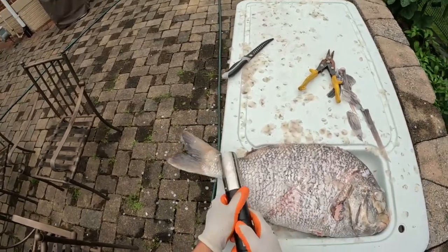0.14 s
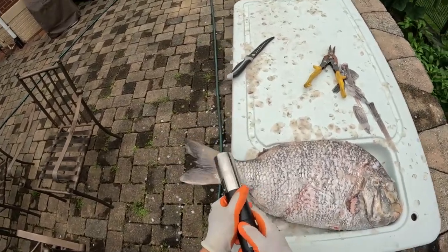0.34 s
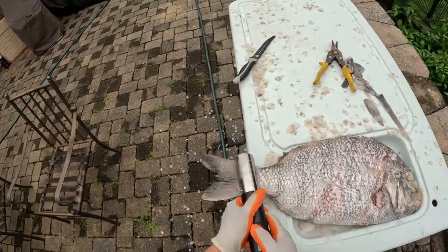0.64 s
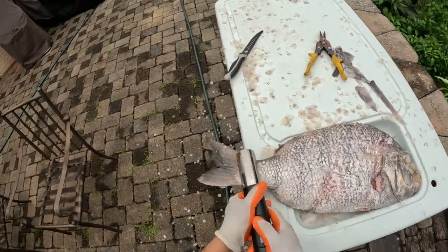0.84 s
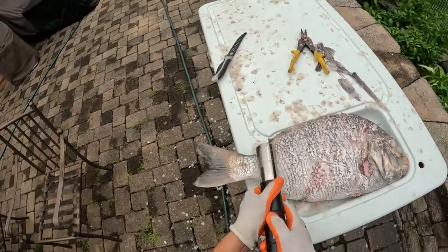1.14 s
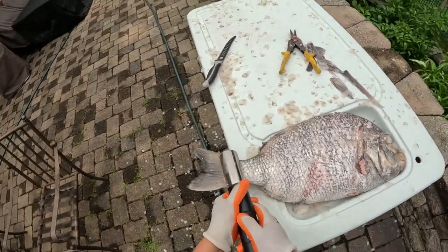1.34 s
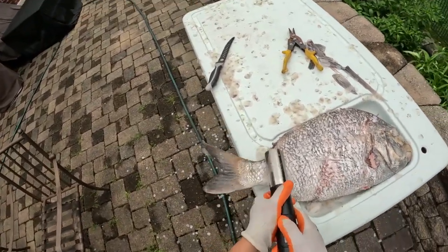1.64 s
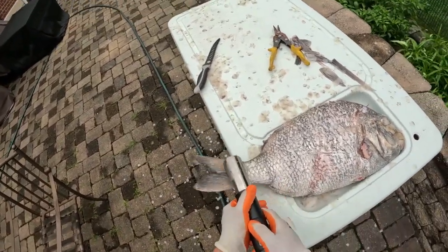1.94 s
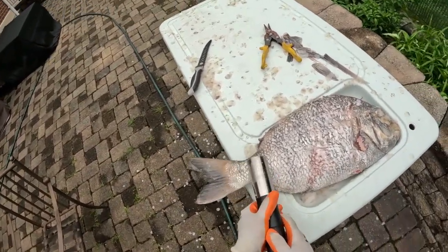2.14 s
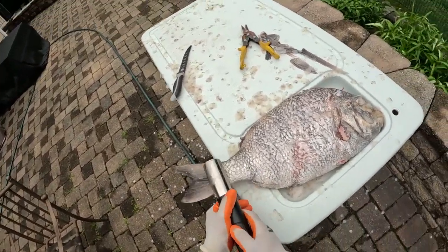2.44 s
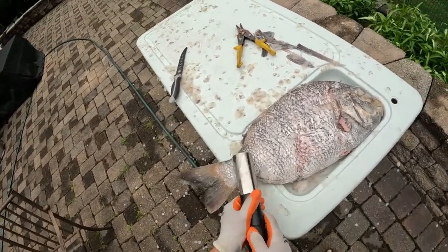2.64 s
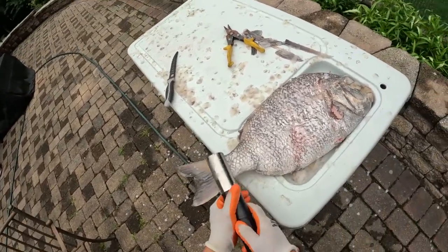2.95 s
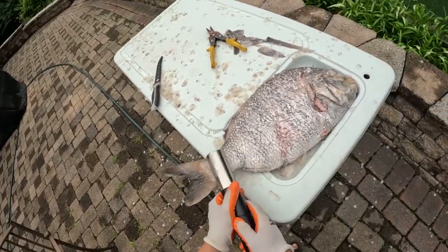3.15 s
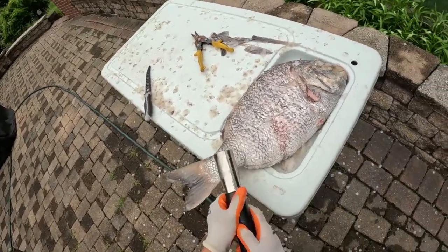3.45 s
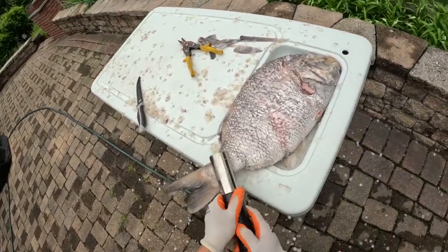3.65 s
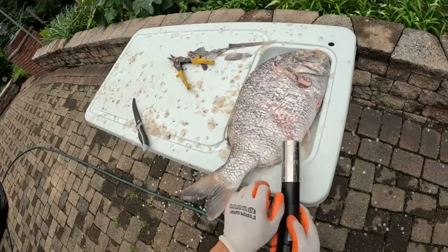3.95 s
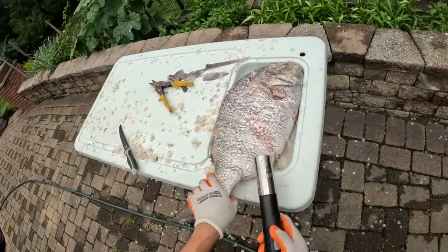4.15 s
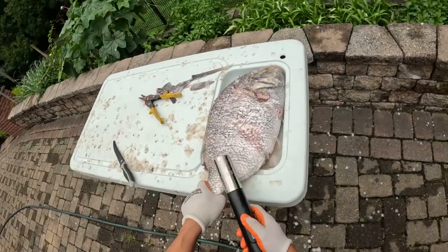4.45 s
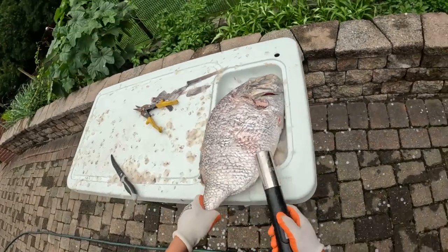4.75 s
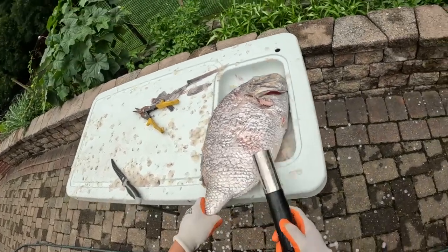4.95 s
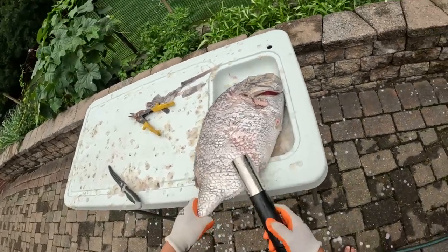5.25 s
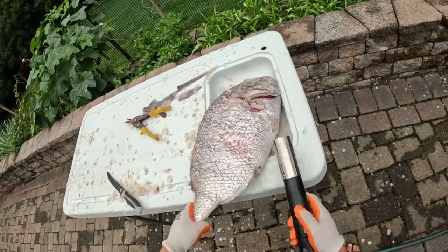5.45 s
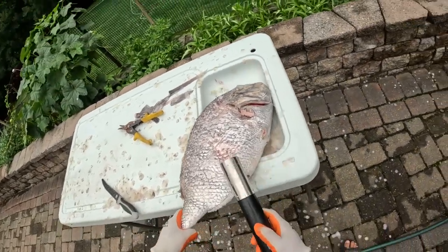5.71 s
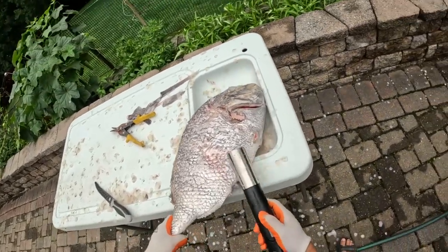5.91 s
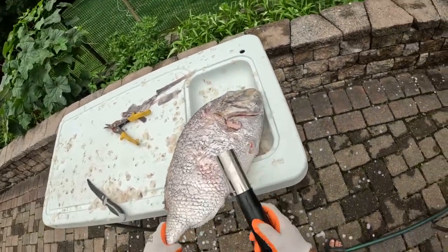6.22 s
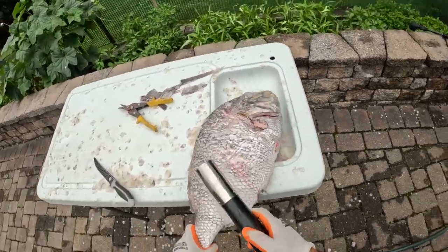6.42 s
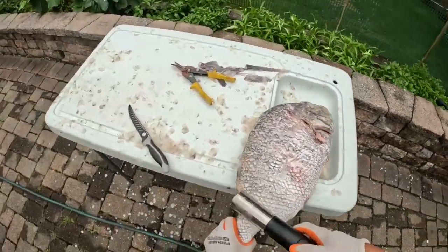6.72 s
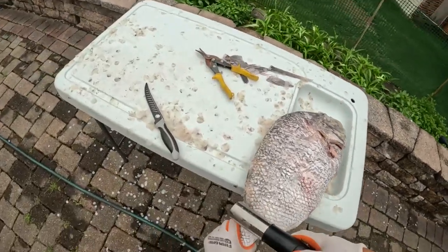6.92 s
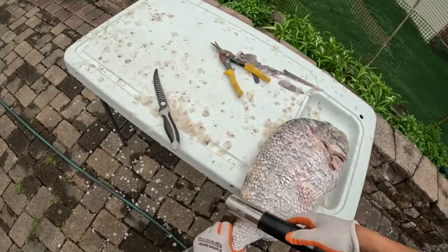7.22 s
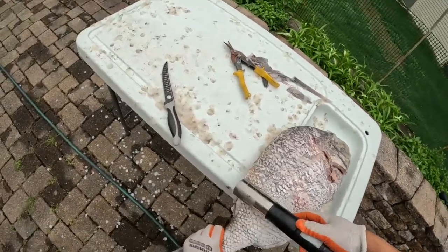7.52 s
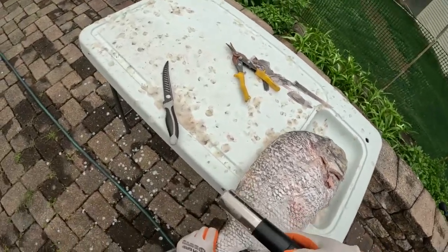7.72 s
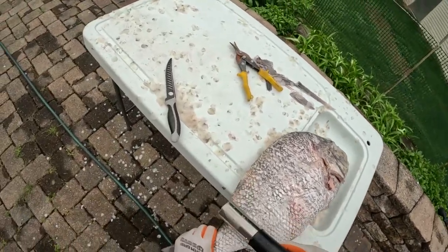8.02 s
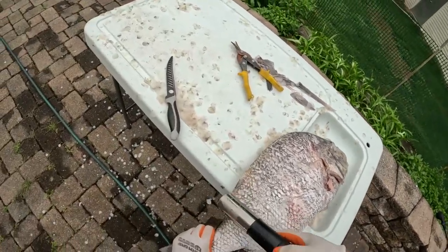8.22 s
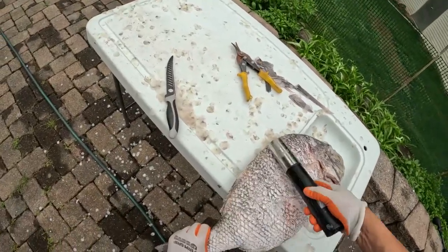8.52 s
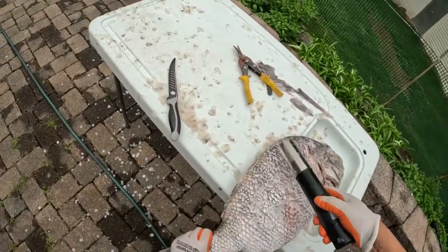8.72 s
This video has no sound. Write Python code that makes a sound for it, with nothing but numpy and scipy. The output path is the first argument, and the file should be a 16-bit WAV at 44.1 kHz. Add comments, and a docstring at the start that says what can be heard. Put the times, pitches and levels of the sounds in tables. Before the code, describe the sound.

Geared motor tool buzzes and groans outdoors, rasping off fish scales in short strokes, stopping twice near the end, with light wind behind.

```python
"""First the rattle and whine of a geared electric scaler, held in the hand over a fish on a hollow plastic
table outdoors. The rattle repeats every turn of the drum, and the gears slow and groan under load.
Six blades scrape and flick scales off, the fish thumps the table, and the switch is let go twice.
Behind it lies a light wind of shaped noise. Two close microphone ports; gain control ducks after hits."""
import sys
import numpy as np
from scipy import signal
from scipy.fft import rfft, irfft
from scipy.io import wavfile
from scipy.ndimage import uniform_filter1d, map_coordinates

SR = 44100
rng = np.random.default_rng(int(sys.argv[2]) if len(sys.argv) > 2 else 0)


def attenuation_scalar(level_db):
    """Turn a level in dB into a linear amplitude multiplier (20 dB per decade)."""
    decades = np.asarray(level_db, float) / 20
    return 10 ** decades


def store_pcm(level_fs):
    """Save levels as 16-bit WAV."""
    pcm = np.round(np.clip(level_fs, -1, 1) * 32767).astype(np.int16)
    wavfile.write(sys.argv[1], SR, np.atleast_2d(pcm).T)


N = 391166  # length in samples

# Levels in the tables are relative: each source sets its own gain, and gain control follows.
# blades pressed on the fish: (start t/s, length t/s, full sag of the whine before judder f/Hz,
# scrape level/dB, shake of the fish level/dB)
PRESSES = [(0, 0.26, 247.8, -40, -51), (0.522, .12, 694, -40.5, -47), (0.781, .29, 597.2, -38.5, -41),
           (1.408, 0.29, 720.8, -38.5, -40.5), (1.912, .24, 479.4, -39.5, -58),
           (2.427, 0.13, 232.3, -41, -46), (2.511, 0.17, 1044, -35, -65), (3.126, 0.19, 757.3, -38, -63),
           (3.67, 0.19, 891.7, -39, -44), (4.515, 0.16, 189.8, -45, -43.5),
           (4.65, 0.24, 519.1, -41.5, -43.5), (5.239, 0.18, 797.8, -40, -37),
           (5.889, .16, 651, -41.5, -36.5), (7.083, 0.15, 198.8, -46, -44), (7.18, 0.27, 450.8, -41, -44.5),
           (8.171, 0.2, 266, -48.5, -41), (8.397, 0.17, 109.7, -42, -53), (8.469, 0.16, 402, -41.5, -39.5)]
# switch let go, then pressed again: (off t/s, on t/s)
SWITCH_RESTS = [(6.355, 7.056), (7.43, 7.962)]
# no-load pitch of the gear whine, mostly falling as the battery tires: (t/s, f/Hz)
FREE_WHINE = [(0, 4016), (3.0, 3962), (5.0, 3865), (6.3, 3857), (8.1, 3800), (8.87, 3895)]
# the hand turns and moves the tool: (t/s, gear rattle level/dB, whine level/dB, shell chatter level/dB)
HAND_LEVELS = [(0, -28, -24, -37), (.3, -30.5, -33, -32.5), (.58, -28, -38, -32.5), (1.3, -29, -32, -36.5),
               (2.2, -28.5, -30, -35.5), (2.9, -32, -33, -38.5), (3.4, -28.5, -29, -40),
               (4.2, -29.5, -29, -36), (4.35, -28.5, -42, -46), (4.6, -29.5, -30.5, -29),
               (5.1, -30, -37.5, -37.5), (5.65, -31, -32, -41), (6.3, -30.5, -34.5, -41.5),
               (7.2, -30.5, -24, -26), (8.05, -29, -29.5, -34), (8.35, -27, -23.5, -24),
               (8.87, -28, -31.5, -39.5)]
# colour of the gear rattle through the housing: (f/Hz, level/dB)
HOUSING_COLOUR = [(240, -47), (500, -35.5), (950, -4), (1500, -2), (2020, -0.5), (2600, -2.5), (3250, -5.5),
                  (4150, -6), (4900, -7.5), (7910, -12), (14300, -39.5), (15500, -69)]
# bunching of the rattle round one to four times the tooth rate: (level/dB each)
MESH_LEVELS = 6.5, 0, 2, -22.5
# further gear tones: (cycles per turn of the drum each)
TONE_CYCLES = 16, 29, 86, 269, 359
# their levels against the rattle, before strain and waver: (level/dB each)
TONE_LEVELS = -17.5, -21, -11, -15.5, -21
# limit of their waver either way: (level/dB each)
TONE_WAVERS = 3.7, 3.3, 6.6, 13.2, 19.3
# modes of the gearbox shell: (f/Hz, level/dB, t60 t/s)
SHELL_MODES = [(1818, -2.5, 0.042), (1941, 6, 0.028), (2104, -4, 0.032)]
# the thin, bony tail end knocks harder than the thick flank: (t/s, level/dB)
BONY_KNOCK = [(2.2, 2.5), (2.8, -1)]
# broad rasp of the metal guard: (f/Hz, level/dB)
RASP_COLOUR = [(1760, -26.5), (3000, 7), (7850, 7), (11000, -6), (14500, -35.5)]
# short modes of the metal guard: (f/Hz, level/dB, t60 t/s)
GUARD_MODES = [(7290, -13.5, 0.0075)]
# modes of the hollow table top: (f/Hz, level/dB, t60 t/s)
TABLE_MODES = [(61, -1, 0.082), (126.6, 0.5, 0.089), (260, 3.5, 0.059), (332, -1.5, 0.075), (475, 2, 0.022),
               (623, -2.5, 0.034), (960, 5, 0.015), (1630, 2.5, 0.013)]
# scales snapping off: (t/s, level/dB)
SCALE_SNAPS = [(0.037, -15), (0.0673, -14.5), (0.134, -24), (0.8566, -6.5), (0.9842, -27), (1.0093, -6.5),
               (1.04, -12), (1.9746, -15.5), (2.016, -13), (2.0526, -13.5), (2.4442, -11.5), (2.542, -9),
               (2.566, -14.5), (2.5768, -4), (2.593, -26), (2.6005, -3), (2.6095, -9.5), (2.637, -3),
               (2.66, -28), (2.6798, -19.5), (2.6882, -14), (2.7332, -9), (3.2106, -25.5), (3.7413, -14),
               (3.8061, -12), (3.918, -13), (4.6891, -14), (4.7116, -15), (4.7299, -11.5), (4.7726, -13),
               (4.79, -19.5), (4.859, -13.5), (4.867, -9.5), (5.33, -10.5), (5.3498, -18.5), (5.3673, -16),
               (5.4911, -14), (7.345, -11.5), (7.4802, -17.5), (7.54, -23), (8.4924, -16)]
# small clicks: the switch pressed on at 7.06 s, then faint ticks while the motor rests: (t/s, level/dB)
SMALL_CLICKS = [(7.0566, -35), (7.7106, -45), (7.7298, -46), (7.8133, -51)]
# the fish lands on the table and bounces: (t/s, level/dB)
FISH_THUMPS = [(2.543, -28.5), (2.608, -20.5), (4.929, -23.5), (5.4998, -8), (5.509, -19), (5.547, -19.5),
               (6.09, -6.5), (6.115, -20), (6.143, -19.5), (6.177, -21.5), (7.428, -28), (7.482, -39)]
# colour of the wind: (f/Hz, level/dB)
WIND_COLOUR = [(12, -50), (30, -1), (65, 0), (233, -11), (369, -48), (1290, -24.5), (4000, -42.5),
               (11700, -67)]
# slow change in the level of the background wind: (t/s, level/dB)
WIND_LEVEL = [(0, -54.5), (6, -43.5), (8.87, -51.5)]
# shifting difference between the ports against their sum: (f/Hz, level/dB)
PORT_DIFFERENCE = [(25, -15.5), (100, -68), (2400, -13), (7000, -19), (12500, -11)]

WHINE_ORDER = 180  # whine cycles per turn of the drum; the tooth rate is half of this
BLADES = 6  # on the drum
LEAN_HZ_PER_S, EASE_S = 7500, 0.035  # load builds at this rate and eases with this time constant
PULL_S, BRAKE_HZ_PER_S = 0.03, 10500  # the motor follows with this lag; friction stops it
JUDDER = 0.25  # uneven scales make the load flutter by this share, rms
BITE_S, LIFT_S, CLEAR_DB = 0.059, 0.099, -54  # scrape swells, dies away; its level with blades clear
MUFFLE_DB, MUFFLE_HZ, FADE_POWER = -15, 700, 2.6  # whine smothered at this sag; fades as gears slow
SPEED_POWER, KICK, KICK_S = 1.75, 0.57, 0.022  # rattle grows with speed and with the motor's pull
STRAIN_DB = 5  # rise of the tones above the whine at a sag of MUFFLE_HZ
CONTACT_S, SOFTEN = 0.0002, 2  # a -14 dB blow touches this long; weaker ones longer, dB per dB


def evened(x):
    """Scales to rms 1."""
    return x / np.sqrt(np.mean(x ** 2) + 1e-20)


def read(points, hz):
    """Reads a spectrum on a log-frequency axis."""
    f, value = np.transpose(points)
    return np.interp(np.log(hz + 1), np.log(f + 1), value)


def columns(rows):
    """Every column of a curve, one value a sample."""
    s, *values = np.transpose(rows)
    return [np.interp(np.arange(N) / SR, s, v) for v in values]


def coloured(x, points):
    """Convolves with the causal, minimum-phase response that has this spectrum."""
    level_db = read(points, abs(np.fft.fftfreq(4096, 1 / SR)))
    log_gain = np.log(attenuation_scalar(np.maximum(level_db, -100)))
    response = np.fft.ifft(np.exp(np.conj(signal.hilbert(log_gain)))).real[:2048]
    return signal.oaconvolve(x, response)[:N]


def ring(hz, t60, size=8000):
    """One dying mode."""
    t = np.arange(size) / SR
    return attenuation_scalar(-60 * t / t60) * np.sin(2 * np.pi * hz * t)


def wander(hz):
    """Low-passed noise of rms 1, wandering slower for a lower corner."""
    return evened(signal.lfilter([1], [1, -np.exp(-2 * np.pi * hz / SR)], rng.standard_normal(N)))


def grains(per_s, spread_db):
    """Random clicks of either sign; a few are large."""
    size = attenuation_scalar(spread_db * np.minimum(rng.exponential(1, N), 4)) * rng.choice([-1., 1.], N)
    return size * (rng.random(N) < per_s / SR)


def passes(cycles):
    """One click at every whole cycle."""
    return np.diff(np.floor(cycles), prepend=0)


def add(mix, s, sound):
    """Mixes a sound in at s seconds."""
    part = mix[round(s * SR):][:len(sound)]
    part += sound[:len(part)]


def motor():
    """Presses and switch set load, speed and blade pressure; speed lags the load, friction stops it."""
    t = np.arange(0, N / SR + .002, .001)  # worked out once a millisecond
    load, scrape, shake = np.zeros((3, len(t)))
    for s, length, sag_hz, scrape_db, shake_db in PRESSES:
        lean = np.clip(LEAN_HZ_PER_S * (t - s), 0, sag_hz)
        load = np.maximum(load, lean * np.exp(-np.maximum(t - s - length, 0) / EASE_S))
        contact = np.clip(np.minimum((t - s) / BITE_S, (s + length - t) / LIFT_S + 1), 0, 1)
        scrape = np.maximum(scrape, contact * (scrape_db - CLEAR_DB))
        shake = np.maximum(shake, contact * attenuation_scalar(shake_db))
    on = 1. - sum((t > off_s) & (t < on_s) for off_s, on_s in SWITCH_RESTS)
    free = np.interp(t, *np.transpose(FREE_WHINE))
    stride = N // len(t)
    flutter = wander(hz=15.)[:stride * len(t):stride]
    hz = free - load * (1 + JUDDER * flutter)  # whine pitch the load asks for
    hz[0] = 3900  # already running
    for k in range(1, len(t)):
        slope = (hz[k] - hz[k - 1]) / PULL_S if on[k] else -BRAKE_HZ_PER_S
        hz[k] = max(hz[k - 1] + slope / 1000, 0)
    pull = signal.lfilter([.001 / KICK_S], [1, .001 / KICK_S - 1], on * (1 - hz / free))
    busy_db = 20 * np.log10((hz / free) ** SPEED_POWER + KICK * pull + 0.00083)
    muffle_db = MUFFLE_DB * (load / MUFFLE_HZ) ** 2 + FADE_POWER * busy_db
    press_db = CLEAR_DB + scrape + busy_db * .8
    return columns(np.c_[t, hz, busy_db, on * load / MUFFLE_HZ, muffle_db, press_db, shake])


def beat(turns):
    """Play in the gears is taken up three times a turn, once harder than the rest (dB)."""
    thirds = 7.0 * np.cos(2 * np.pi * (3 * turns + .1 * wander(hz=5.)))
    return thirds + 3.5 * np.cos(2 * np.pi * turns) + 3.0 * np.tanh(wander(hz=30.))


def gears(turns, drive, load, rattle_db, whine_db):
    """Tooth flaws repeat a rattle each turn, bunched round the meshing orders; play adds fresh noise."""
    order = np.arange(1025)
    mesh = 1 + sum(attenuation_scalar(db) / (1 + ((order - k * WHINE_ORDER / 2) / 11.3) ** 2)
                   for k, db in enumerate(MESH_LEVELS, 1))
    patches = attenuation_scalar(1.2 * np.repeat(rng.standard_normal(32), 64))  # rougher and smoother parts of a turn
    flaws = evened(irfft(mesh * rfft(rng.standard_normal(2048) * patches)))
    repeated = map_coordinates(flaws, [turns % 1 * 2048], order=3, mode="grid-wrap")
    play = rng.standard_normal(N) * attenuation_scalar(9.7 * np.tanh(wander(hz=45.)))
    rattle = evened(coloured(repeated + attenuation_scalar(-7) * play, HOUSING_COLOUR))
    for k, db, waver_db in zip(TONE_CYCLES, TONE_LEVELS, TONE_WAVERS):
        strain_db = STRAIN_DB * load * (k > WHINE_ORDER)
        level = drive * attenuation_scalar(db + strain_db + waver_db * np.tanh(wander(hz=24.3)))
        cycles = k * (turns + 0.00035 * wander(hz=40.)) + rng.random()
        rattle += level * np.sin(2 * np.pi * cycles)
    whine = drive * np.sin(2 * np.pi * WHINE_ORDER * turns + 0.5 * wander(hz=50.))
    return attenuation_scalar(rattle_db) * rattle + attenuation_scalar(whine_db) * whine


def groan(turns, drive, load, rattle_db):
    """Teeth sing roughly at the tooth rate, more under load, swelling twice a turn, jolted by each blade."""
    level = drive * (0.053 + load) * attenuation_scalar(7.0 + 3.0 * np.tanh(wander(hz=44.6)))
    swell = 1 + 0.52 * np.cos(4 * np.pi * turns)
    jolt = 1 + np.minimum(load, 1) * np.cos(2 * np.pi * BLADES * turns)
    tone = np.sin(np.pi * WHINE_ORDER * turns + wander(hz=60.))
    return attenuation_scalar(rattle_db) * level * swell * jolt * tone


def shell(force):
    """The gearbox shell rings at its own pitch, whatever the speed."""
    modes = sum(attenuation_scalar(db) * ring(hz, t60, size=1500) for hz, db, t60 in SHELL_MODES)
    return signal.oaconvolve(force, modes)[:N]


def chatter(level_db, beat_db):
    """Loose gears clatter against the shell in bursts."""
    return attenuation_scalar(level_db) * evened(shell(attenuation_scalar(beat_db) * rng.standard_normal(N)))


def guard(force):
    """The metal guard round the drum: its short modes over the broad rasp."""
    modes = sum(attenuation_scalar(db) * ring(hz, t60, size=400) for hz, db, t60 in GUARD_MODES)
    return coloured(force, RASP_COLOUR) + signal.oaconvolve(force, modes)[:N]


def table(force):
    """The hollow table top rings under any force; neighbouring modes swing opposite ways."""
    modes = sum((-1) ** k * attenuation_scalar(db) * ring(hz, t60) for k, (hz, db, t60) in enumerate(TABLE_MODES))
    return signal.oaconvolve(force, modes)[:N]


def blades(turns, press_db, shake):
    """Passing blades lift scales: clumped grains ring the guard, blows go through the fish to the table."""
    bite = .4 + np.exp(-(BLADES * turns % 1) / .3)
    clumps = attenuation_scalar(4.3 * wander(hz=29.2).clip(-2, 1))
    crackle = bite * clumps * (grains(900.0, 2.94) + 0.53 * rng.standard_normal(N))
    rasp = attenuation_scalar(1.19 * press_db + 18.0) * evened(guard(crackle))
    blows = bite * grains(600., 1.6)
    flesh = signal.lfilter(*signal.butter(N=2, Wn=[350, 1500], btype="band", fs=SR), blows)
    knocking = attenuation_scalar(5.5) * evened(flesh) + evened(table(blows))
    # fish and table shake at the blade rate
    throb = shake * np.sqrt(2) * np.sin(2 * np.pi * BLADES * turns)
    return rasp + throb + attenuation_scalar(press_db + columns(BONY_KNOCK)[0]) * knocking


def nicks(turns, press_db):
    """Blade passes catch scale edges: sharp clicks into guard and housing, most small, some large."""
    size = attenuation_scalar(press_db + 11.0 + 2.24 * np.minimum(rng.exponential(1, N), 2))
    size = size * rng.choice([-1., 1.], N)
    catch = size * passes(BLADES * turns + 0.16 * wander(hz=63.9)).clip(0)
    return guard(catch) + attenuation_scalar(-11.5) * shell(catch)


def snaps():
    """A scale tears in slips that build and let go, rings at its own pitch, knocks the shell; small clicks."""
    slips, knocks, rings = np.zeros((3, N))
    t = np.arange(600) / SR
    for (s, db), pitch in zip(SCALE_SNAPS, rng.random(len(SCALE_SNAPS))):
        fall_db = 60 * np.maximum((.004 - t) / 0.011, (t - .004) / 0.0045)  # either side of the release
        slip = attenuation_scalar(db - fall_db) * rng.standard_normal(600)
        add(slips, s - .004, slip)
        add(rings, s - .004, np.convolve(slip, ring(4300 + 2600 * pitch, 0.0045, size=300)))
        add(knocks, s, attenuation_scalar(db) * np.ones(1))
        add(slips, s, attenuation_scalar(db + 3.5) * np.ones(1))
    for s, db in SMALL_CLICKS:
        add(knocks, s, attenuation_scalar(db - 60 * t / 0.007) * rng.standard_normal(600))
    return attenuation_scalar(-15) * shell(knocks) + attenuation_scalar(-15.0) * guard(slips) + attenuation_scalar(-14.5) * rings


def thumps():
    """The fish gives the table a push, the longer the softer, then a dull settling."""
    force = np.zeros(N)
    t = np.arange(4000) / SR
    for s, db in FISH_THUMPS:
        touch_s = min(CONTACT_S * attenuation_scalar(SOFTEN * (-14 - db)), .0015)
        push = np.sin(np.pi * np.minimum(t / touch_s, 1)) / (touch_s * SR)
        settle = 0.031 * uniform_filter1d(rng.standard_normal(4000), size=14) * attenuation_scalar(-60 * t / 0.22)
        add(force, s, attenuation_scalar(db) * (push + settle))
    return -attenuation_scalar(-2.0) * table(force)


def wind():
    """Shaped noise: a lumpy rumble with a distant hush above it."""
    level_db = columns(WIND_LEVEL)[0] + 6.2 * np.tanh(wander(hz=19))
    return attenuation_scalar(level_db) * evened(coloured(rng.standard_normal(N), WIND_COLOUR))


def scene():
    """All sources, heard from one spot."""
    whine_hz, busy_db, load, muffle_db, press_db, shake = motor()
    rattle_db, whine_db, chatter_db = columns(HAND_LEVELS)
    rattle_db = rattle_db + busy_db
    whine_db = whine_db + muffle_db + 4.0 * np.tanh(wander(hz=18.))
    turns = np.cumsum(whine_hz / WHINE_ORDER) / SR
    drive = (whine_hz / whine_hz.max()) ** 3  # tones blur away as the gears slow
    beat_db = beat(turns)
    near = gears(turns, drive * attenuation_scalar(0.3 * beat_db), load, rattle_db, whine_db)
    near += groan(turns, drive, load, rattle_db) + chatter(chatter_db + busy_db, beat_db)
    near += blades(turns, press_db, shake) + nicks(turns, press_db)
    near += snaps() + thumps() + wind()
    return np.array([near, near])


def levelled(x, knee_db=-20.0, squeeze=0.79, recover_db_per_s=202.0):
    """Gain control, more sensitive to treble: ducks after loud clicks and thumps, then recovers."""
    treble_lifted = signal.lfilter([2, -1.5], [1], x)
    power = uniform_filter1d(treble_lifted ** 2, size=80, origin=39)
    power_db = 10 * np.log10(abs(power) + 1e-12)
    fall = np.arange(N) * recover_db_per_s / SR
    held_db = np.maximum.accumulate(power_db + fall) - fall  # peaks decay at the recovery rate
    over_db = np.maximum(held_db - knee_db, 0)
    return attenuation_scalar(-squeeze * uniform_filter1d(over_db, size=100, origin=49))


def roll_off(x):
    """The treble ends steeply here."""
    return signal.sosfilt(signal.butter(12, 15770, fs=SR, output="sos"), x)


def record(dry):
    """Two close ports: reflections differ and shift as the hands move; the left hears a moment later."""
    dry = dry * levelled(dry[0])
    hz, t, z = signal.stft(dry[0], SR, nperseg=512)
    noise = rng.standard_normal((len(t), len(hz), 2))
    a, b = uniform_filter1d(uniform_filter1d(noise, size=5, axis=0), size=4, axis=1).T
    shifting = attenuation_scalar(read(PORT_DIFFERENCE, hz))[:, None] * (evened(a) + 1j * evened(b))
    lean = -.035 - 1j * (hz / 4000 * np.exp(-hz / 3500))[:, None]  # left a little weaker and later
    side = signal.istft(z * (shifting + lean), SR, nperseg=512)[1][:N]
    band_limit = signal.butter(20, 14500, fs=SR, output="sos")
    ports = signal.sosfilt(band_limit, dry + np.outer([1, -1], side))
    return roll_off(ports)


dry = scene()
out = record(dry)
store_pcm(out)
```